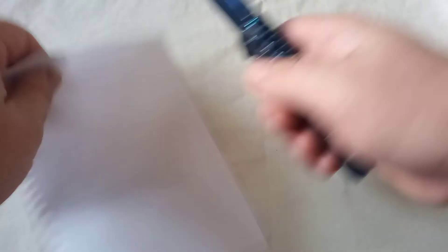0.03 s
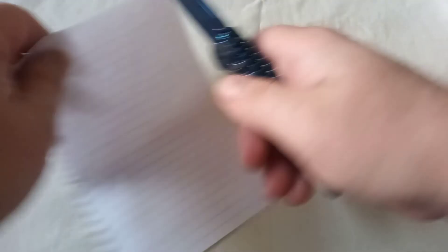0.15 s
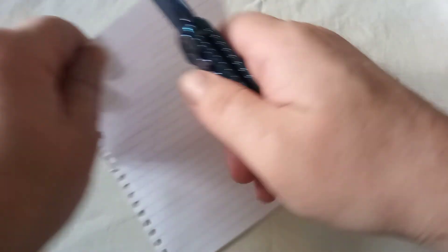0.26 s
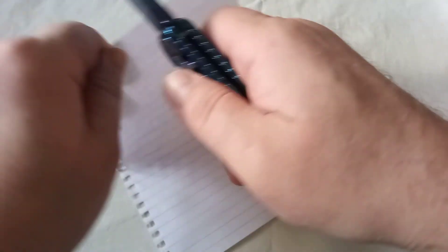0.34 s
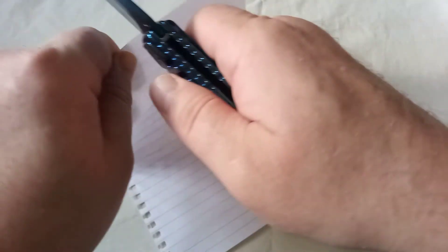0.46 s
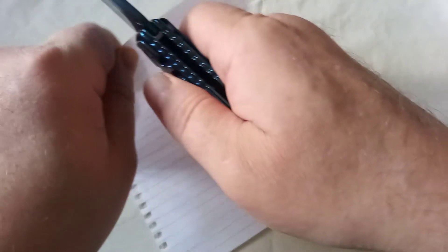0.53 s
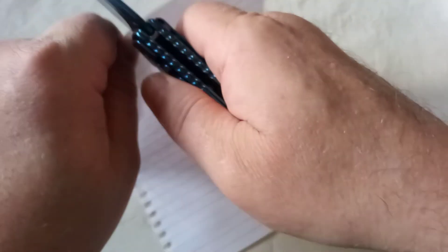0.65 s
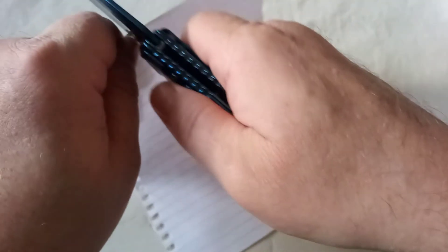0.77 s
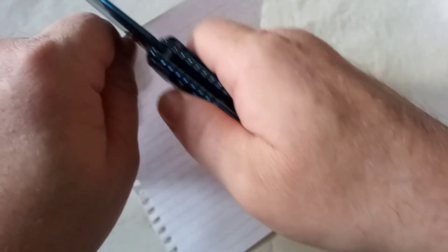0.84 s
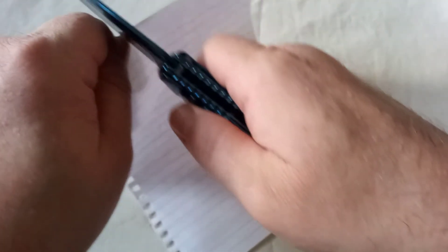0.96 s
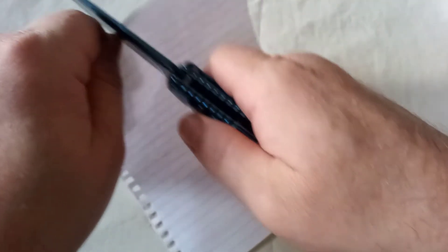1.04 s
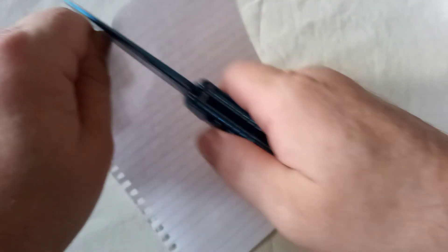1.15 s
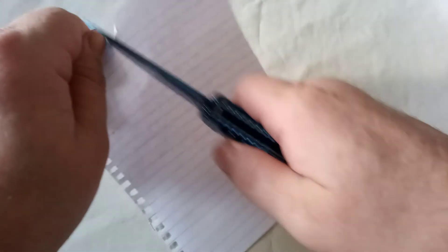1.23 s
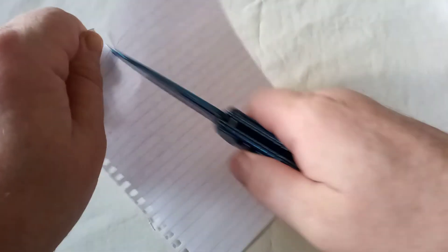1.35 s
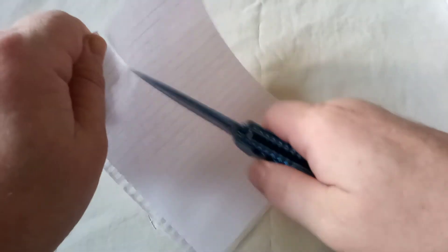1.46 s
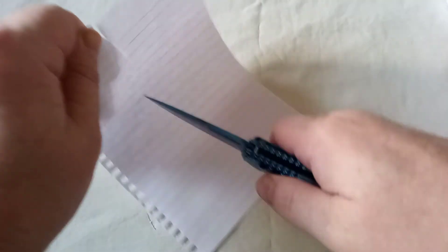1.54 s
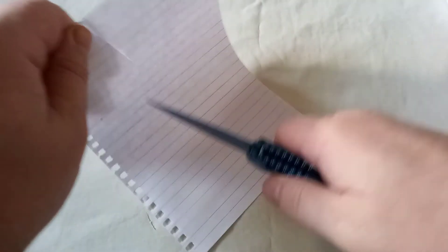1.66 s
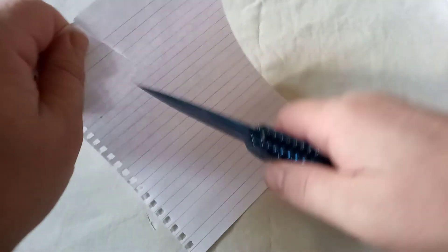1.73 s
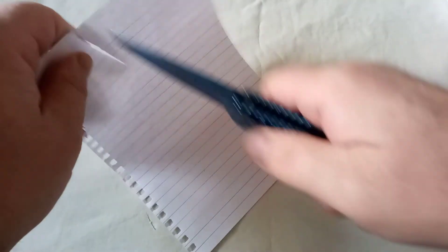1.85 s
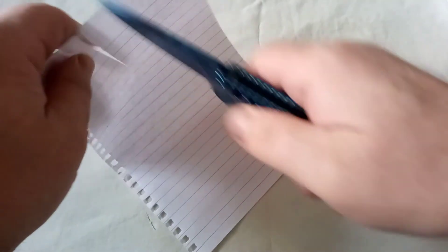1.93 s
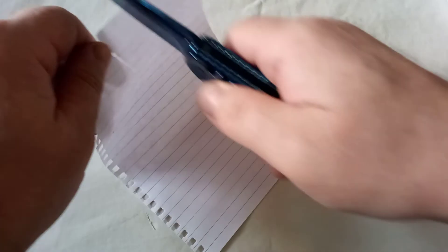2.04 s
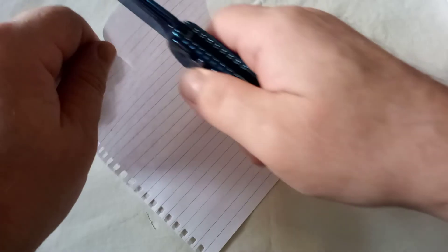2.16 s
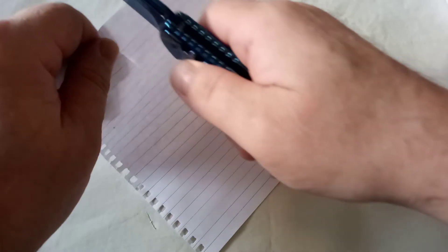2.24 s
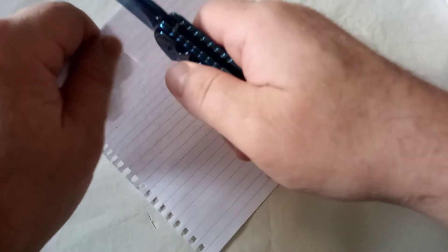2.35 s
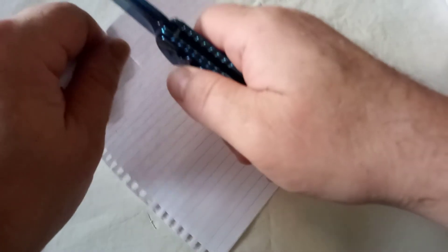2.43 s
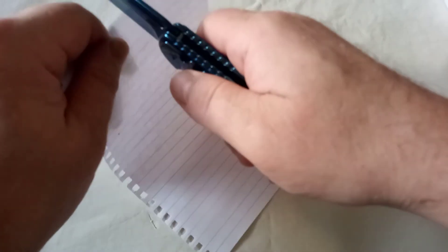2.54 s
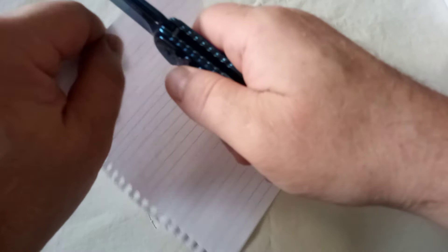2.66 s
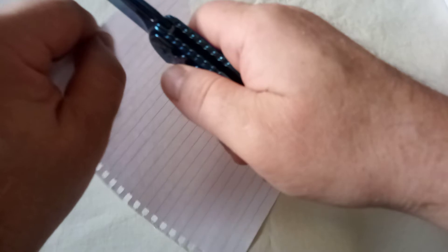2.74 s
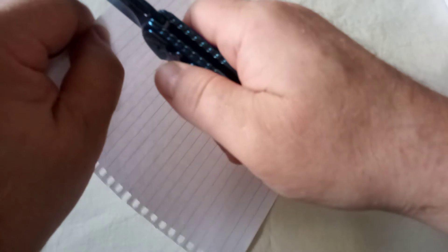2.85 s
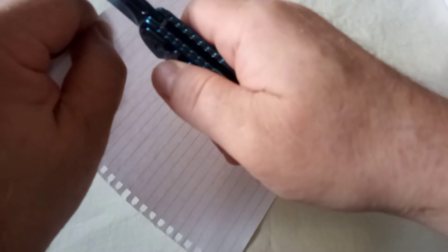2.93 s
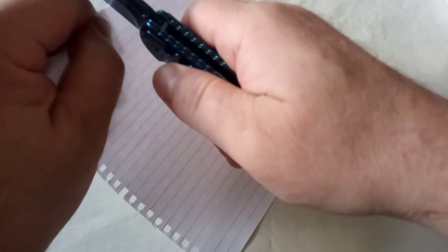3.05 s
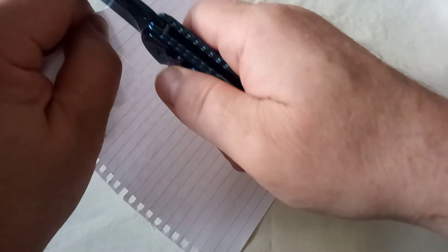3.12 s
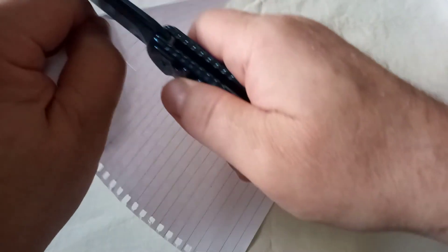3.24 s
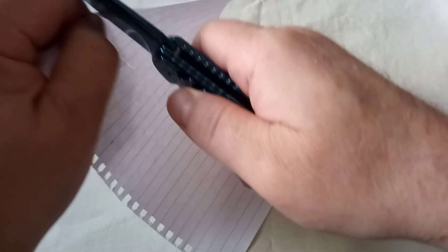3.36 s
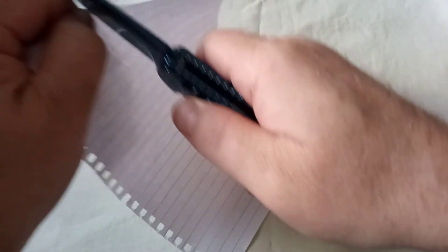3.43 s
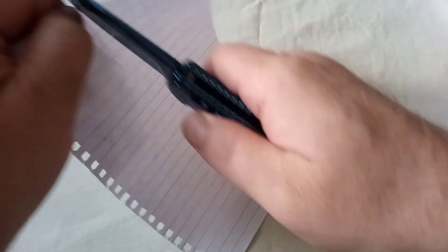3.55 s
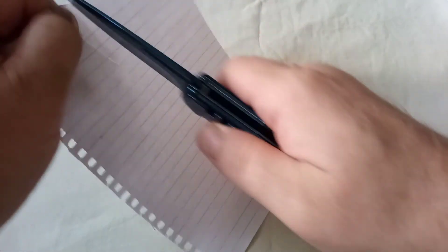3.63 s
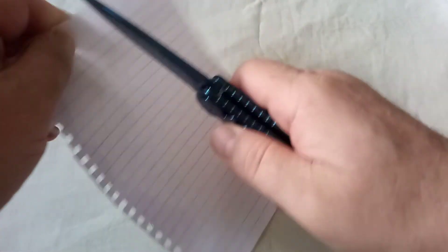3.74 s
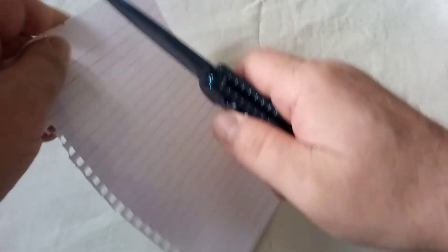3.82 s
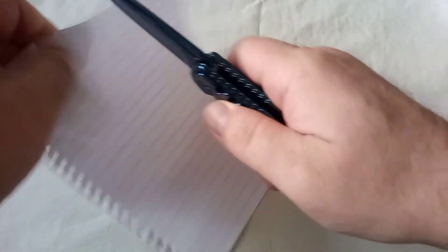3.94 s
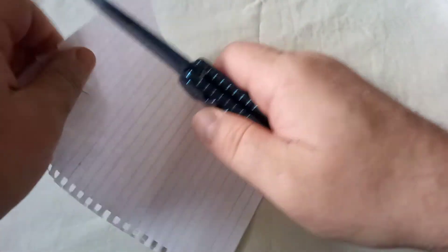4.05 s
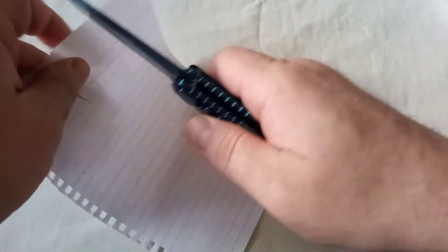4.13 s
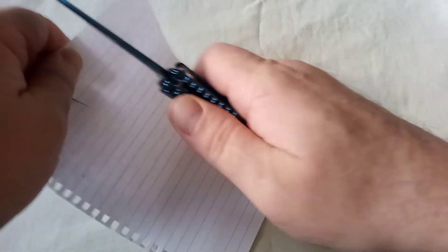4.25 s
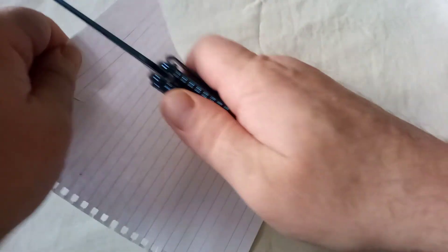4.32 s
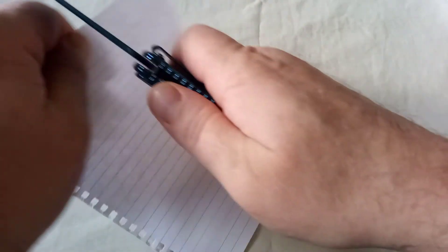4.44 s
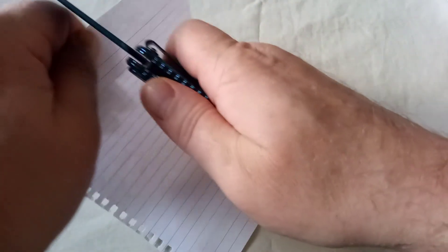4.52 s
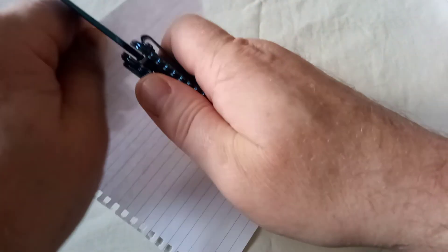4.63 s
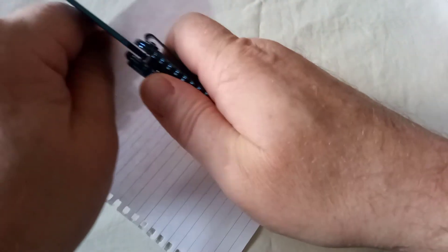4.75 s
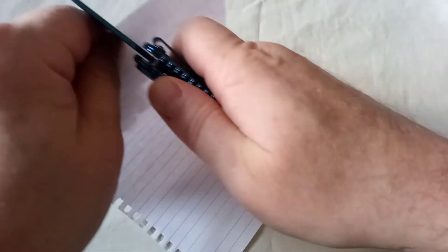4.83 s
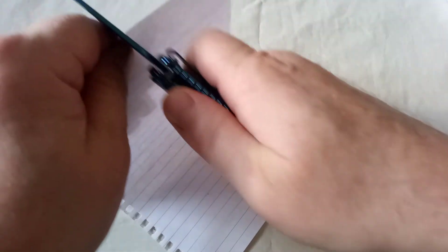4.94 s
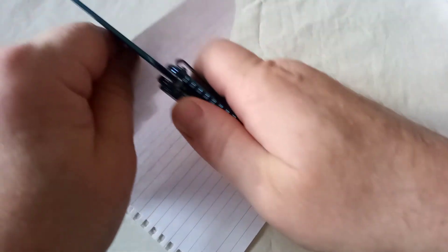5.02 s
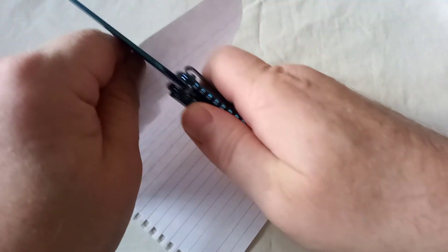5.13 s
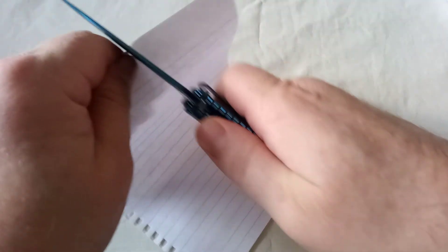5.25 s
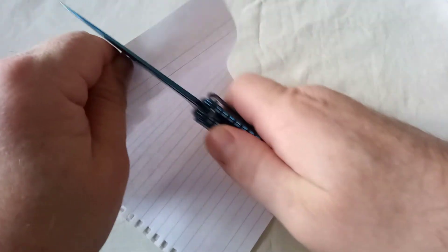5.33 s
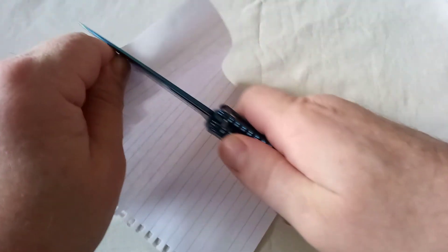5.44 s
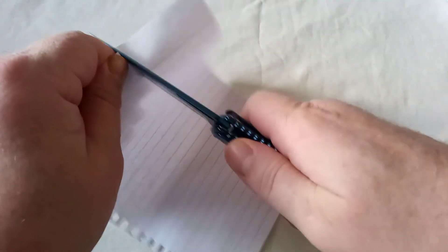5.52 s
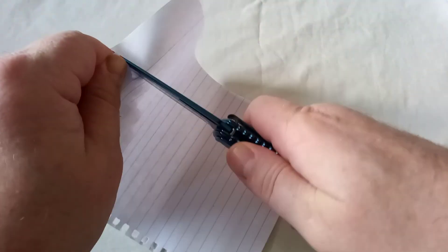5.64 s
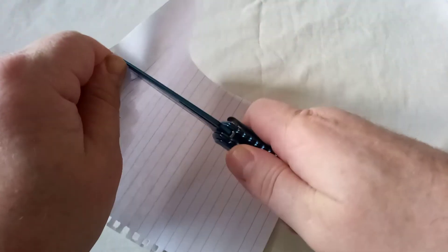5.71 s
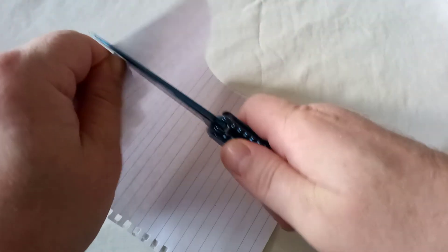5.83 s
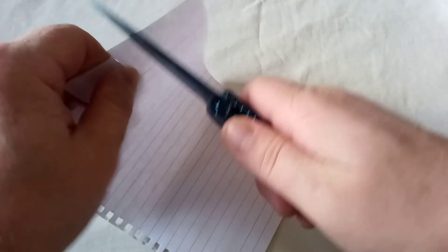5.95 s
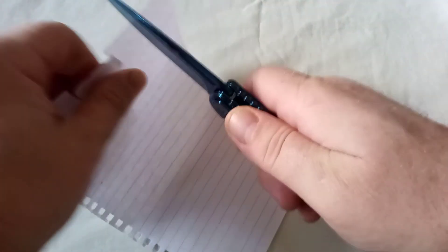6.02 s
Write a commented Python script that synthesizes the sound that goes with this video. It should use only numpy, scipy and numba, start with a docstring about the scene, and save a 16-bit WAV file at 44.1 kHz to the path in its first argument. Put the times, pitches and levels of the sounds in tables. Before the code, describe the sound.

Close paper handling and soft crackles, one loud rasping knife cut, a short scrape along the edge, then a lighter, thinner second slice.

```python
"""A knife presses into a sheet of paper and cuts it, later hisses along the rim, then nicks and cuts again.
The sheet also brushes past fingers and steel, bends, buckles and snaps, close by in a small quiet room.
Breaking fibres are a dense rain of tiny clicks over smooth noise, coloured by the sheet's resonances.
Snaps are short cracks with ringing thumps; bending is soft low noise; the room adds a tail and still air."""
import sys
import numpy as np
from scipy import signal
from scipy.fft import rfft, irfft
from scipy.io import wavfile
from scipy.ndimage import uniform_filter1d
from numba import njit

SR = 44100
rng = np.random.default_rng(int(sys.argv[2]) if len(sys.argv) > 2 else 0)


def to_wav(sig):
    """Store sig (one row per channel, or 1-D mono) as 16-bit WAV at the path in sys.argv[1].

    Samples outside -1..1 are clipped; the rate is SR.
    """
    pcm = np.clip(np.atleast_2d(sig), -1, 1) * 32767
    pcm = np.round(pcm).astype(np.int16)
    wavfile.write(sys.argv[1], SR, pcm.T)  # frames by channels


N = 268128
TIME = np.arange(N) / SR
# gestures are slow, so their envelopes need only a coarse clock
CLOCK = TIME[::32]

# Levels in these tables are starting levels: the sources, the room and the microphone adjust them further.

# Spectrum of the still air. Each row: frequency in Hz, level in dB.
AIR_COLOUR = [(18, -43), (30, -4.5), (183, 2.5), (244, -10), (286, -8), (496, -5), (611, -3.5),
              (661, -12.5), (1610, -12.5), (2040, -12.5), (2900, -15.5), (4000, -19), (5200, -20),
              (5820, -19), (7970, -26.5), (15800, -37)]
AIR_DB = -81.5  # level before the microphone
ROOM_T60_S, ROOM_DB = 0.34, -12.5  # time to fade by 60 dB, energy of the tail
# Echo paths off the two hands and the table. Each row: extra length in metres, gain.
NEAR_PATHS = [(.24, -.2), (.39, .2), (.72, .17)]

# The sheet bulges as the grip shifts. Each row: time of the peak in seconds, level in dB.
BULGES = [(0.03, -66.5), (0.18, -64), (0.35, -67.5), (0.46, -66.5), (0.65, -67), (0.92, -69), (1.03, -88),
          (1.1, -73.5), (1.3, -63), (1.45, -60.5), (1.62, -80), (1.73, -71), (1.89, -69), (2.01, -75.5),
          (2.19, -70), (2.502, -70), (2.992, -72), (3.21, -72.5), (3.31, -73), (3.54, -72), (3.7, -66.5),
          (3.97, -66), (4.08, -64), (4.212, -66.5), (4.321, -63), (5.0, -70), (5.1, -74.5), (5.25, -71.5),
          (5.4, -68.5), (5.538, -60), (5.66, -70), (5.82, -74), (5.94, -72)]
BULGE_S = 0.041  # time from the peak of a bulge down to 1/e
# sliding flexes the sheet too: level at the reference hiss, and dB gained per dB of hiss
FLEX_DB, FLEX_SLOPE, HISS_REF_DB = -75.5, 0.34, -55
# Spectrum of the bending sheet. Each row: frequency in Hz, level in dB.
FLEX_COLOUR = [(25, -34.5), (45, -20.5), (70, -3.5), (110, 0.5), (170, -0.5), (250, 1.5), (330, 0.5),
               (430, -9), (540, -12), (800, -41.5)]

# The sheet slides under fingers and blade. Each row: time of full contact in seconds, attack in seconds,
# hold in seconds, hiss in dB, drumming in dB relative to the hiss, sizzle in dB relative to the hiss.
SLIDES = [(0.0, .01, 0.011, -54.5, -7, -1.5), (0.085, 0.11, 0.11, -53, -8.5, -0.5),
          (0.278, 0.075, 0.015, -57, -7.5, -4.5), (0.33, 0.0084, 0.056, -66.5, -1, -1),
          (0.45, 0.03, 0.014, -67, 3, -5), (0.48, 0.043, 0.17, -70.5, -22, -4.5),
          (1.54, .04, 0.015, -53.5, -13, -3), (1.63, 0.022, 0.045, -71, -27, -3),
          (1.7, 0.044, 0.051, -56, -12.5, 2.5), (1.785, 0.027, 0.019, -64, -8.5, 3.5),
          (1.888, 0.038, 0.0043, -61, 0.5, 0), (1.94, 0.059, .04, -61.5, -11.5, 3.5),
          (2.03, 0.025, 0.085, -73, -1, 0), (2.175, 0.053, .015, -72, 2.5, -1),
          (2.315, 0.072, 0.071, -69, -7.5, 0.5), (2.485, 0.026, 0.011, -67.5, -6, -2.5),
          (2.625, 0.094, 0.037, -72, -3.5, 2.5), (3.125, 0.041, .04, -77.5, -5.5, -2.5),
          (3.188, 0.036, 0.011, -61, 4.5, -8.5), (3.685, 0.063, 0.01, -56, -8.5, 5.5),
          (3.735, 0.027, 0.0065, -64, -4, 0.5), (3.808, 0.04, .11, -55, -12, 0),
          (3.945, 0.039, 0.028, -65, -0.5, 1.5), (4.053, 0.015, 0.012, -53.5, -5.5, 1),
          (4.095, .02, 0.19, -72, -4.5, -8), (4.209, 0.025, 0.0083, -54.5, -5.5, 1),
          (4.298, .02, 0.0065, -59, -4.5, -2.5), (4.332, 0.0076, 0.0057, -55, -7, -4),
          (4.38, .02, 0.06, -76, 2.5, 0), (4.46, 0.018, 0.055, -77, -2.5, -0.5),
          (4.54, .03, 0.14, -89, 0.5, 3), (4.715, 0.042, .085, -85, -16, 5),
          (4.765, .01, 0.0017, -66.5, -20, 4), (5.605, 0.014, 0.0097, -53, -12, -1.5),
          (5.725, 0.021, 0.0068, -50.5, -19, -4), (5.76, 0.025, 0.06, -57, -12, -2.5),
          (5.82, 0.019, 0.013, -54, -15, 3.5), (5.923, 0.035, 0.0033, -55, -11, -0.5),
          (5.97, .015, 0.02, -64, -12, -1), (6.037, 0.021, 0.0095, -59, -9.5, -2.5),
          (6.075, 0.017, .02, -50.5, -6, -7)]
# Spectrum of the sliding. Each row: frequency in Hz, level in dB.
SLIDE_COLOUR = [(240, -41.5), (400, -13.5), (544, -7.5), (824, -8.5), (1550, -3), (2070, 1.5), (3000, 3.5),
                (3490, 2.5), (5800, 1.5), (8010, -4.5), (9350, -3), (11400, -20.5), (13500, -27),
                (14800, -22), (15800, -28)]
# Resonances of the sheet held for sliding, in Hz.
SLIDE_RING_HZ = (1120, 1900, 2610, 4260, 5600, 6330)

# Buckles and fibre snaps. Each row: time in seconds, crack energy in dB, thump energy in dB,
# brightness (above 0 favours the treble).
SNAPS = [(0.0456, -37, -25, -2), (0.3244, -17, -28.5, -11.5), (0.584, -51, -41.5, 14),
         (0.646, -24, -35.5, 1), (0.6624, -27, -38.5, 1), (0.7184, -24.5, -28.5, -18),
         (0.9393, -21, -30.5, -12), (0.952, -16.5, -31, 8), (0.981, -8, -25, -0.5), (0.9982, -16, -37, -1),
         (1.4246, 0, -27, -27), (1.431, -17, -9.5, -4.5), (1.5956, -27.5, -33.5, 9),
         (1.6877, -21.5, -34.5, 4), (1.7872, -25.5, -37, -4), (1.8185, -33, -35.5, -11),
         (1.8844, -20, -33.5, -4), (2.063, -32, -40, -5), (2.2187, -23.5, -39, 10),
         (2.4809, -22.5, -27, -7), (2.501, -28.5, -33.5, -4), (2.9727, -25.5, -23.5, -8),
         (3.254, -23.5, -38.5, -26), (3.5814, -23.5, -56, 14), (3.829, -32, -39, -7), (3.9065, -30, -55, 7),
         (3.9491, -27, -38, -21), (4.0454, -25, -41, -2), (4.088, -29, -27.5, 3), (4.2016, -22.5, -25, -13),
         (4.2756, -48, -32, -7), (4.3216, -19.5, -28, -19), (4.433, -33, -47, 4), (4.769, -23.5, -67, 11),
         (4.9639, -23.5, -31, 15), (4.975, -20, -43, -5), (5.394, -19, -42, 8), (5.4815, -5.5, -36, 13),
         (5.5219, -4.5, -13, 6), (5.5287, -14, -35, 6), (5.5617, -13, -45, 14), (5.8168, -14, -32, 6),
         (5.965, -21, -36, 0)]
# Low modes of the sheet. Each row: frequency in Hz, level in dB, time to fade by 60 dB in seconds.
SHEET_MODES = [(246, -9.5, 0.029), (367, -4.5, 0.052), (470, -9.5, 0.015), (670, -6, 0.007), (750, 1, .022),
               (900, -7.5, .012), (1030, -4, 0.016), (1170, -6.5, .014)]
# Spectrum of a crack. Each row: frequency in Hz, level in dB.
CRACK_COLOUR = [(300, -21.5), (900, -11.5), (1800, 3.5), (3000, 6), (4300, -1.5), (6200, 2), (7800, -9),
                (9300, -12.5), (12000, -32), (16000, -32.5)]

# The edge skids along the rim without biting. Each row: time in seconds, hiss in dB,
# drumming in dB relative to the hiss, sizzle in dB relative to the hiss.
SKID = [(3.255, -51, -7, -8), (3.317, -49, -2.5, -4), (3.395, -57, -6.5, 2), (3.515, -46.5, -6, -0.5),
        (3.555, -49.5, -3.5, -0.5)]
# Spectrum of the skid. Each row: frequency in Hz, level in dB.
SKID_COLOUR = [(240, -44), (400, -10), (536, -14), (1020, -4), (1290, -3), (1650, 7), (1950, -3.5),
               (2310, 7), (3040, 1), (3290, 0), (6460, -6.5), (8260, -9), (9200, -3), (10200, -13),
               (15800, -26)]
# Resonances of the sheet held for the skid, in Hz.
SKID_RING_HZ = (1000, 2350, 4600, 6500)

# The edge nicks the rim. Each row: the same columns as SLIDES.
NICKS = [(4.868, 0.026, 0.056, -48.5, -26.5, -5), (4.992, 0.011, 0.047, -51.5, -21.5, -4)]
# The second cut. Each row: the same columns as SKID.
SECOND_CUT = [(5.152, -46.5, -21.5, 1.5), (5.25, -45.5, -20.5, 4.8), (5.37, -44, -15, -3),
              (5.535, -44.5, -7, -1.3)]
# Spectrum of the second cut. Each row: frequency in Hz, level in dB.
SECOND_COLOUR = [(240, -62), (400, -35), (587, -21.5), (751, -11.5), (1310, -11), (1550, -3.5),
                 (1890, -8.5), (2070, -2.5), (3290, -1), (7090, -8), (8010, -18), (8650, -12.5),
                 (10100, -17.5), (12300, -31.5), (15800, -31)]
# Resonances of the sheet as the edge leaves the second cut, in Hz.
SECOND_RING_HZ = (1130, 2320, 3080, 4950, 6270)

# The edge presses ever harder on the rim before it bites. Each row: the same columns as SKID.
BITE = [(0.75, -59.5, -6, -10.5), (0.9, -50.5, -12.5, -7), (0.95, -48.5, -8.5, -6.5)]
# Spectrum of the bite. Each row: frequency in Hz, level in dB.
BITE_COLOUR = [(240, -41.5), (400, -15.5), (519, -28.5), (615, -16), (961, -15.5), (1480, -10.5),
               (2100, -4.5), (2530, -2.5), (3040, 1.5), (4610, -3), (5460, -3), (7310, -25), (9350, -13),
               (12000, -41.5), (15800, -46)]
# Resonances of the sheet held for the bite, in Hz.
BITE_RING_HZ = (1020, 2990, 4030, 5820)

# The first cut, from bite to exit. Each row: the same columns as SKID.
FIRST_CUT = [(1.0, -39, -17.5, -2.5), (1.078, -41.5, -12, -8), (1.13, -39.5, -13.5, -3),
             (1.194, -41, -5.5, 2), (1.266, -35.5, -5.5, -2.5), (1.42, -35.5, -4, 0)]
# Spectrum of the first cut. Each row: frequency in Hz, level in dB.
FIRST_COLOUR = [(240, -33.5), (400, -14), (519, -17.5), (740, -8.5), (1370, -4.5), (1650, -1), (2010, -1),
                (2860, -3.5), (3290, -2.5), (5210, -3), (6660, -9), (7770, -13.5), (9490, -11.5),
                (12100, -30), (15800, -34)]
# Resonances of the sheet as the edge leaves the first cut, in Hz.
FIRST_RING_HZ = (1641, 3200, 4400, 5100, 6300)
# The taut sheet drums like a skin while it is cut. Each row: frequency in Hz, level in dB.
SKIN_COLOUR = [(60, -34), (130, -15.5), (220, -7.5), (330, 0), (400, -2.5), (500, -13.5), (800, -36)]

# Resonances of the microphone port. Each row: frequency in Hz, width in Hz, boost or cut in dB.
PORT = [(538, 62, -5.5), (755, 190, 2), (1450, 140, -1.5), (6460, 470, 2), (8090, 1000, -1.5),
        (9050, 1100, 3.5), (13500, 2200, -5.5), (14830, 920, 5.5)]
TOP_HZ = 15850


def undb(db):
    """Turn decibels into gain."""
    return np.exp(np.asarray(db) * (np.log(10) / 20))


def unit(x):
    """Scale to rms 1."""
    return x / np.sqrt(np.mean(x ** 2))


def burst(x):
    """Scale to energy 1."""
    return x / np.sqrt(np.sum(x ** 2))


def curves(rows):
    """Join each column of a table by straight lines in time, with the corners rounded."""
    s, *columns = np.transpose(rows)
    return [uniform_filter1d(np.interp(TIME, s, column), size=130) for column in columns]


def response(points, size=2048):
    """Make an impulse response with the given (Hz, dB) spectrum and no sound before its start."""
    hz, db = np.transpose(points)
    bins = np.maximum(np.arange(size // 2 + 1) * SR / size, 1)
    level_db = np.interp(np.log(bins), np.log(hz), db)
    # folding the cepstrum forward in time makes the filter minimum-phase
    cepstrum = irfft(np.log(undb(level_db)))
    cepstrum[1:size // 2] *= 2
    cepstrum[size // 2 + 1:] = 0
    return irfft(np.exp(rfft(cepstrum)))


def colour(x, points):
    """Filter a sound by a (Hz, dB) spectrum."""
    return signal.fftconvolve(x, response(points))[:len(x)]


def highpass(x, hz):
    """Take away the bass below hz."""
    return signal.sosfilt(signal.butter(2, hz, "highpass", fs=SR, output="sos"), x)


def registers(x):
    """Split into the drumming, hissing and sizzling ranges of paper, each at rms 1."""
    hz = np.arange(len(x) // 2 + 1) * SR / len(x)
    spectrum = rfft(x)
    low, below_top = (1 / (1 + (hz / edge_hz) ** 8) for edge_hz in (1400, 4500))
    shares = (low, below_top - low, 1 - below_top)
    return [unit(irfft(spectrum * share, len(x))) for share in shares]


def walk(rate):
    """Random levels, held for 1 / rate seconds and joined by slopes, with rms near 1."""
    hold = max(int(SR / rate), 2)
    steps = np.repeat(rng.standard_normal(N // hold + 1), hold)
    return unit(uniform_filter1d(steps, hold)[:N])


@njit
def resonance(x, hz, damping):
    """Ring at a moving pitch: a state-variable band-pass filter."""
    y, band, low = np.empty(len(x)), 0., 0.
    for i in range(len(x)):
        g = np.tan(np.pi * hz[i] / SR)
        v = (band + g * (x[i] - low)) / (1 + g * (g + damping))
        band, low, y[i] = 2 * v - band, low + 2 * g * v, damping * v
    return y


def fibres(per_second, spread_db, rub, catch_db, catch_rate):
    """Fibres break as clicks of uneven size over smooth rubbing; the edge catches and slips."""
    breaks = rng.random(N) < per_second / SR
    sizes = undb(spread_db * np.minimum(rng.exponential(size=N), 5)) * rng.choice([-1, 1], N)
    rubbing = rub * rng.standard_normal(N)
    return (unit(breaks * sizes) + rubbing) * undb(catch_db * walk(catch_rate))


def bent(force, ring_hz, ring, width_hz, wander, tension=1):
    """The sheet's resonances wander with its curve; hands and table add short, drifting echoes."""
    sound = force
    for hz in ring_hz:
        centre_hz = np.minimum(hz * tension * np.exp(wander * walk(12)), SR / 3)
        # width_hz is the width near 3000 Hz; it grows with the square root of the pitch
        damping = float(width_hz / np.sqrt(3000 * hz))
        sound = sound + ring * resonance(force, centre_hz, damping)
    out = sound
    for metres, gain in NEAR_PATHS:
        delay_s = (metres + .025 * walk(7)) / 343  # speed of sound in m/s
        out = out + gain * np.interp(TIME - delay_s, TIME, sound)
    return out


def radiate(force, gains, points, hiss_db, drum_db, sizzle_db, flutter_db):
    """The sheet radiates the force; how taut it is held sets the share of its low and high ranges."""
    # a small sheet radiates almost no bass
    bands = registers(highpass(colour(force, points), 180))
    out = 0
    for band, gain, db in zip(bands, gains, (drum_db, hiss_db, sizzle_db)):
        out = out + band * gain * undb(db + flutter_db * walk(60))
    return out


def gate(start_s, end_s, attack_s, release_s):
    """Press in until the start, hold, and die away after the end."""
    pressing = np.clip(1 + (CLOCK - start_s) / attack_s, 0, 1)
    fading = np.minimum(np.maximum(CLOCK - end_s, 0) / release_s, 20)
    return pressing * np.sqrt(pressing) * np.exp(-fading)


def stroke(rows, attack_s, release_s):
    """Gains of drumming, hiss and sizzle through one stroke of the knife."""
    hiss_db, drum_db, sizzle_db = curves(rows)
    contact = np.interp(TIME, CLOCK, gate(rows[0][0], rows[-1][0], attack_s, release_s))
    return undb([hiss_db + drum_db, hiss_db, hiss_db + sizzle_db]) * contact


def touches(rows, release_s):
    """Gains of drumming, hiss and sizzle for short, even contacts, added as power."""
    power = 0
    for s, attack_s, hold_s, db, drum_db, sizzle_db in rows:
        gains = undb([db + drum_db, db, db + sizzle_db])
        power = power + np.outer(gains ** 2, gate(s, s + hold_s, attack_s, release_s) ** 2)
    return np.array([np.interp(TIME, CLOCK, band) for band in np.sqrt(power)])


def slit(rows, octaves_per_s):
    """The resonances sink as the slit lengthens and the sheet slackens."""
    start_s, end_s = rows[0][0], rows[-1][0]
    return 2 ** (octaves_per_s * (end_s - np.clip(TIME, start_s, end_s)))


def still_air():
    """The quiet room's air is steady, coloured noise."""
    return unit(colour(rng.standard_normal(N), AIR_COLOUR)) * undb(AIR_DB)


def room(x):
    """Near walls return a short diffuse tail that dulls as it fades."""
    t = np.arange(SR // 2) / SR
    fade = np.exp(-np.log(1000) * t / ROOM_T60_S)
    build_up = np.clip(t / 0.0035, 0, 1) ** 2
    tail = rng.standard_normal(len(t)) * fade * build_up
    dull = signal.sosfilt(signal.butter(1, 3000, fs=SR, output="sos"), tail)
    # the treble part fades faster
    tail = dull + (tail - dull) * np.exp(-t / 0.13)
    return x + undb(ROOM_DB) * signal.fftconvolve(x, burst(tail))[:N]


def flex(hiss):
    """The bending sheet pushes air in soft, irregular bumps: a little as it slides, more where it bulges."""
    force = fibres(per_second=240, spread_db=3.0, rub=0.89, catch_db=1.5, catch_rate=35)
    moving = undb(FLEX_DB) * (hiss / undb(HISS_REF_DB)) ** FLEX_SLOPE
    bulges = sum(undb(db) * np.exp(-((CLOCK - s) / BULGE_S) ** 2) for s, db in BULGES)
    bulging = np.interp(TIME, CLOCK, bulges)
    return unit(colour(force, FLEX_COLOUR)) * np.hypot(moving, bulging)


def slides(gains):
    """Paper brushes past skin and steel as the grip changes; now and then a tiny crease crackles."""
    force = fibres(per_second=1400, spread_db=2.0, rub=1.0, catch_db=1.42, catch_rate=110)
    creases = fibres(per_second=82, spread_db=3.0, rub=0, catch_db=6.0, catch_rate=16)
    sound = bent(force + 0.15 * creases, SLIDE_RING_HZ, ring=0.4, width_hz=1000, wander=.09)
    return radiate(sound, gains, SLIDE_COLOUR, hiss_db=-2.0, drum_db=-0.5, sizzle_db=-2.5, flutter_db=1.34)


def snaps(crack_db, thump_db, crinkle, crinkle_s, build_s, size=6000):
    """A buckle builds and pops: a crinkle around a sharp crack, and a thump in the sheet's low modes."""
    lead = 300  # samples of build-up before the crack
    out = np.zeros(N + size)
    t = (np.arange(size) - lead) / SR
    hz, mode_db, t60 = np.transpose(SHEET_MODES)[:, :, None]
    swell = np.exp(-abs(t) / np.where(t < 0, build_s, crinkle_s))
    for s, crack, thump, bright in SNAPS:
        push = crinkle * burst(rng.standard_normal(size) ** 3 * swell)
        push[lead] += 1
        tilted = [(f, db + bright * np.clip(0.43 * np.log2(f / 4500), -.6, .6)) for f, db in CRACK_COLOUR]
        # every bend of the sheet tunes its modes a little differently
        detune = 1 + 0.065 * rng.standard_normal(hz.shape)
        # a sharper snap favours the higher modes
        struck_db = mode_db + 0.52 * bright * np.log2(hz / hz.mean())
        fade = undb(struck_db - 60 * abs(t) / t60)
        ring = np.sum(fade * np.cos(2 * np.pi * hz * detune * t), axis=0)
        ring = colour(ring * (t >= 0), [(60, -20), (200, -6.5), (1200, 0), (2500, -18), (6000, -34.5)])
        start = int(s * SR) - lead
        out[start:start + size] += undb(crack + crack_db) * burst(colour(push, tilted))
        out[start:start + size] += undb(thump + thump_db) * burst(ring)
    # air slips round the edges of the sheet, so the bass cancels
    return highpass(out[:N], 130)


def skid(gains):
    """The edge rubs along the rim: many small fibre clicks make a fine, smooth hiss."""
    force = fibres(per_second=6200, spread_db=1.5, rub=0.66, catch_db=1.26, catch_rate=230)
    sound = bent(force, SKID_RING_HZ, ring=0.76, width_hz=920, wander=0.044)
    return radiate(sound, gains, SKID_COLOUR, hiss_db=-2.5, drum_db=-3.0, sizzle_db=-0.5, flutter_db=0.1)


def second_cut(cutting, nicking):
    """Two nicks, then a light slice; the sheet drums faintly once the edge is in."""
    force = fibres(per_second=3500, spread_db=3.0, rub=0.97, catch_db=0.9, catch_rate=180)
    tension = slit(SECOND_CUT, octaves_per_s=0.68)
    sound = bent(force, SECOND_RING_HZ, ring=0.82, width_hz=400, wander=0.063, tension=tension)
    rasp = radiate(sound, cutting + nicking, SECOND_COLOUR,
                   hiss_db=-1.9, drum_db=-1.5, sizzle_db=-1.3, flutter_db=0.56)
    skin_db = -35  # relative to the hiss gain
    return rasp + unit(colour(force, SKIN_COLOUR)) * cutting[1] * undb(skin_db)


def slips(per_second, from_s, ring_hz, damping, length_s):
    """The edge sticks and slips; each slip rings the taut rim for a few milliseconds."""
    chance = rng.uniform(-1, 1, (32, 2))  # uneven timing and size of each slip
    times = from_s + (np.arange(len(chance)) + .35 * chance[:, 0]) / per_second
    bursts = sum(undb(2 * size) * np.exp(-((CLOCK - s) / length_s) ** 2)
                 for s, size in zip(times, chance[:, 1]))
    rasp = resonance(rng.standard_normal(N), np.full(N, float(ring_hz)), float(damping))
    rasp = colour(rasp, [(500, -3.0), (2000, 3), (6000, -7.5), (7500, 0), (12000, -16.5)])
    return np.interp(TIME, CLOCK, bursts) * unit(rasp)


def bite(gains):
    """The edge drags on the rim, louder and louder, and chatters before it breaks in."""
    force = fibres(per_second=2800, spread_db=1.5, rub=0.56, catch_db=0.9, catch_rate=310)
    sound = bent(force, BITE_RING_HZ, ring=0.67, width_hz=410, wander=.03)
    drag = radiate(sound, gains, BITE_COLOUR, hiss_db=-1.5, drum_db=-1, sizzle_db=1, flutter_db=1.0)
    chatter = slips(per_second=65, from_s=.89, ring_hz=3165, damping=.21, length_s=0.0029)
    slip_db = 4  # relative to the hiss gain
    return drag + gains[1] * undb(slip_db) * chatter


def first_cut(gains):
    """The edge breaks fibres as it runs through the taut sheet, which drums along."""
    force = fibres(per_second=5000, spread_db=2.0, rub=0.47, catch_db=0.93, catch_rate=260)
    tension = slit(FIRST_CUT, octaves_per_s=0.63)
    sound = bent(force, FIRST_RING_HZ, ring=0.6, width_hz=580, wander=0.09, tension=tension)
    rasp = radiate(sound, gains, FIRST_COLOUR, hiss_db=-1.0, drum_db=-1.5, sizzle_db=-1.0, flutter_db=0.4)
    skin_db = -21  # relative to the hiss gain
    return rasp + unit(colour(force, SKIN_COLOUR)) * gains[1] * undb(skin_db)


def scene():
    """Knife and paper in the room, over its still air."""
    sliding = touches(SLIDES, release_s=0.018)
    skidding = stroke(SKID, attack_s=0.021, release_s=0.015)
    nicking = touches(NICKS, release_s=0.0052)
    second = stroke(SECOND_CUT, attack_s=0.064, release_s=0.033)
    pressing = stroke(BITE, attack_s=0.092, release_s=0.066)
    first = stroke(FIRST_CUT, attack_s=0.025, release_s=0.031)

    paper = flex(sliding[1]) + slides(sliding)
    paper = paper + snaps(crack_db=-6.0, thump_db=-2.5, crinkle=1.0, crinkle_s=0.0049, build_s=0.0011)
    knife = skid(skidding) + second_cut(second, nicking) + bite(pressing) + first_cut(first)
    return (room(paper + knife) + still_air())[None]


def record(dry):
    """The microphone port colours the sound and the top is cut."""
    for hz, width_hz, db in PORT:
        band = signal.lfilter(*signal.iirpeak(min(hz, SR / 2 - 1), hz / width_hz, fs=SR), dry)
        dry = dry + (undb(db) - 1) * band
    return signal.sosfilt(signal.ellip(10, .2, 70, TOP_HZ, fs=SR, output="sos"), dry)


dry = scene()
out = record(dry)
to_wav(out)
```